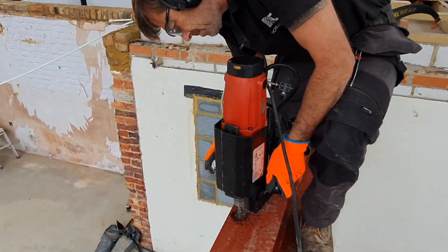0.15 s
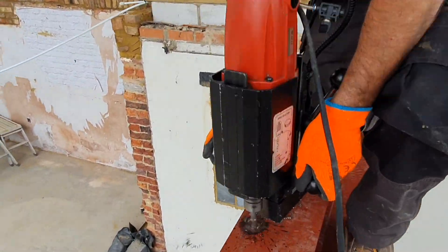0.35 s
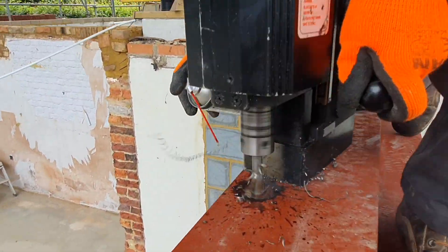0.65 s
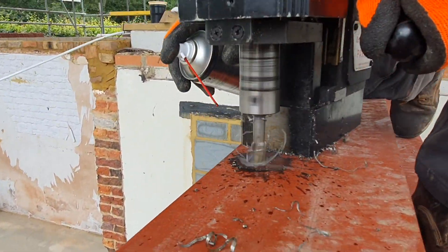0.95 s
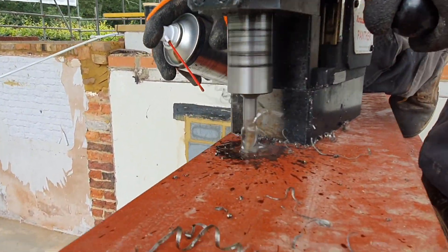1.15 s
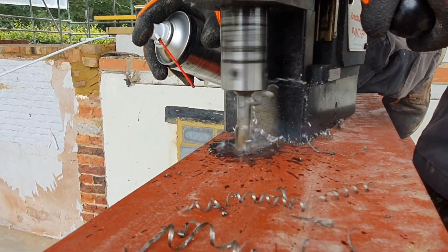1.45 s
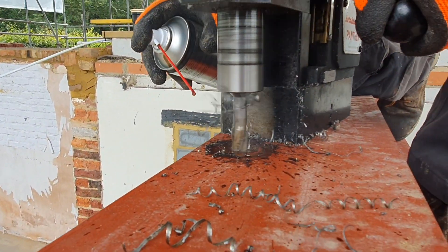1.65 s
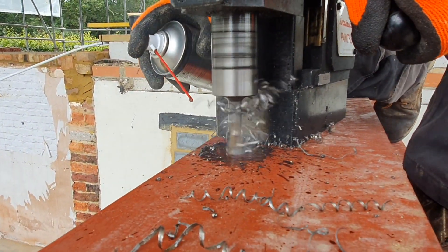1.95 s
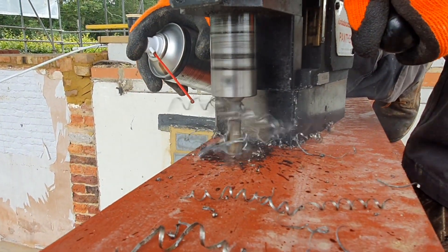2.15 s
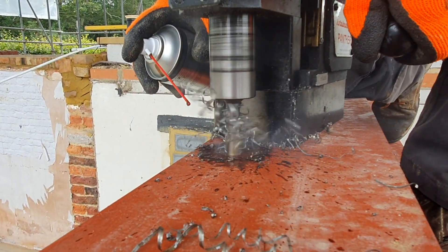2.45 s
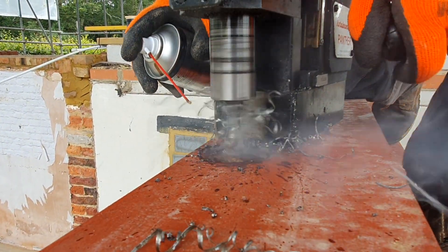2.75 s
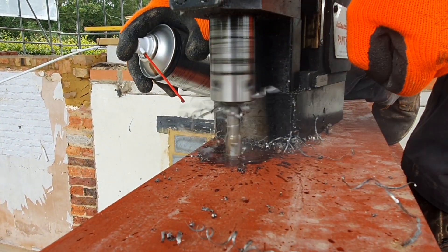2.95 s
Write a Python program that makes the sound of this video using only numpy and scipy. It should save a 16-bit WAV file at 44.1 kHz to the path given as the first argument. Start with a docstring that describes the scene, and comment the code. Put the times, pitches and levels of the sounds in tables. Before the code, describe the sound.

A magnetic drill bores through a steel beam close to the microphone, its high gear whine wavering over a bright cutting hiss and rushing fan air. Near the end, metal chips scrape as the cutter eases.

```python
"""Magnetic drill in a steel beam

Close to the microphone, in mono. The gears whine, sagging in pitch and singing out as the cutter
is pressed harder. The cutter hisses in the steel, throbbing with a gear shaft, and chips scrape
as it eases. With them come the rotor's comb of thin lines and the cooling fan's broad rush."""
import sys
import numpy as np
from scipy.fft import rfft, irfft, next_fast_len
from scipy.io import wavfile
from scipy.ndimage import map_coordinates

SR = 44100
rng = np.random.default_rng(int(sys.argv[2]) if len(sys.argv) > 2 else 0)


def log_audio(samples):
    """Write samples as a 16-bit WAV file to the path given in sys.argv[1]."""
    # one column per channel
    frames = np.atleast_2d(samples).T
    # limit to full scale, then quantise
    limited = np.clip(frames, -1, 1)
    pcm = np.round(limited * 32767).astype(np.int16)
    wavfile.write(sys.argv[1], SR, pcm)


N = 136710

# tooth rate of the first gear pair: t/s, f/Hz
TOOTH_RATE = [(0, 1241.3), (0.3, 1225), (0.42, 1227), (0.57, 1202), (0.63, 1204), (0.75, 1219), (0.9, 1234),
              (1.2, 1245), (1.5, 1242), (1.7, 1253), (1.8, 1245), (1.91, 1232), (2.1, 1235), (2.25, 1228),
              (2.48, 1245), (2.63, 1223), (2.73, 1214.7), (2.83, 1257), (2.94, 1242), (3.005, 1220),
              (3.09, 1281)]
# steady gear partials: multiple of the tooth rate, level/dB, flutter/dB, jitter/rad
STEADY_PARTIALS = [(1, -36, 1, 0.15), (3, -41, 3, 0.58), (4, -41, -0.5, 0.36)]
# gear partials that sing under load: t/s, level/dB of the 2nd, 5th and 10th
SINGING_LEVELS = [(0, -36, -28.5, -39), (.35, -34.5, -31.5, -33), (.53, -35.5, -28, -25),
                  (.63, -37, -32.5, -30), (.7, -36, -35, -38), (.95, -35.5, -31.5, -35),
                  (1.25, -35, -32.5, -33), (1.76, -35, -34.5, -33), (1.88, -35, -28, -26),
                  (1.96, -36, -34.5, -32), (2.17, -33.5, -30, -25), (2.33, -36, -33.5, -35),
                  (2.5, -33, -32, -33), (2.55, -33, -29.5, -25), (2.71, -34.5, -29, -24),
                  (2.8, -39.5, -49, -42), (2.88, -34.5, -35, -27), (2.985, -30, -28.5, -32),
                  (3.015, -42, -39, -46), (3.1, -43, -37, -46)]
# partials that grow as the motor bogs down: multiple of the tooth rate, base level/dB
STRAIN_PARTIALS = [(7, -53), (8, -47), (9, -43.5)]
# the cut: t/s, hiss level/dB, share of the deep sound (0-1)
CUT_COURSE = [(0, -23.5, 0.15), (.9, -23.5, 0.33), (1.55, -23, 0.13), (1.75, -23, 0.3), (1.87, -22, 0.9),
              (2.35, -22, 0.78), (2.56, -21.5, 1), (2.8, -23.5, 1), (2.9, -23.5, 0.97), (3.03, -27.5, 1),
              (3.1, -26, 1)]
# hiss of the shallow and of the deep cut: f/Hz, relative level/dB
SHALLOW_SPECTRUM = [(3000, -60), (6800, -20), (8050, -11), (8600, 4), (8950, -5.5), (9300, 1.5), (9850, 1),
                    (10300, -1), (11150, 2), (11600, -1.5), (12200, 0), (12700, -5), (14000, -4.5),
                    (15600, -7.5)]
DEEP_SPECTRUM = [(3000, -71), (6800, -36), (8050, -3), (8600, 0), (8950, -3), (9300, -0.5), (9850, -1.5),
                 (10250, -9), (10700, -14), (11150, 2), (12200, 0.5), (12700, 1), (14000, -1),
                 (15600, -8.5)]
# scraping chips: f/Hz, relative level/dB
CHIP_SPECTRUM = [(100, -90), (1000, -39), (2800, -4), (4000, -1.5), (4850, 4), (5400, -7), (9000, -30)]
# course of the scraping: t/s, level/dB
CHIP_LEVEL = [(0, -48), (2.7, -50), (2.85, -32), (3.0, -39), (3.07, -29), (3.1, -30)]
# fan air and housing: f/Hz, relative level/dB
FAN_SPECTRUM = [(30, -59), (100, -63), (150, -44), (200, -32.5), (320, -21.5), (600, -17), (1000, -10.5),
                (1400, -5), (1950, -8.5), (2600, -1), (3200, -4), (4000, -3.5), (4800, -0.6), (5350, -8.5),
                (5800, -5), (6800, -1.15), (7600, -2.4), (9000, -3.5), (16000, -16)]
# rotor lines: multiple of the rotor speed, relative level/dB
ROTOR_LINES = [(9, -54), (30, -47), (31, -52), (32, -50), (40, -38.5), (42, -43), (43, -40), (44, -40),
               (46, -46), (49, -41.5), (50, -41), (53, -42.5), (55, -45), (56, -44), (57, -45), (61, -45),
               (71, -46)]
# mains hum: f/Hz, level/dB
HUM_LINES = [(120, -94.5), (240, -68.5)]

TEETH, ROTOR_TURNS = 31, 5  # per turn of the lay shaft
SHAFT_TURNS_PER_TOOTH = .03  # the shaft that throbs
FLUTTER_HZ, TOP_HZ = 128.4, 15800


def gear_whine(mesh, shaft):
    """Meshing teeth: some partials hold steady, others sing with the load and swing with the shaft."""
    whine = sum(amp(db) * partial(k * mesh, flutter, jitter)
                for k, db, flutter, jitter in STEADY_PARTIALS)
    swayed = mesh + .08 * np.sin(shaft)
    throb_db = 1.2 * np.cos(shaft)
    for k, db in zip((2, 5, 10), curves(SINGING_LEVELS)):
        gain = amp(db + .14 * wobble(21.9))
        whine += gain * partial(k * swayed, flutter_db=1.7, jitter_rad=.3, swell_db=throb_db)
    return whine


def gear_strain(mesh, mesh_hz, deep):
    """A metallic edge on the whine when the motor slows, weaker in the deep cut."""
    free_hz, db_per_hz = 1245, .1613
    gain = amp(db_per_hz * (free_hz - mesh_hz) - 7 * deep)
    return gain * sum(amp(db) * partial(k * mesh, flutter_db=2, jitter_rad=.25)
                      for k, db in STRAIN_PARTIALS)


def cutter_hiss(rotor, shaft, level_db, deep):
    """The cutter hisses in the steel, pulsing once a shaft turn and twice a rotor turn."""
    hiss = np.sqrt(1 - deep) * noise(SHALLOW_SPECTRUM) + np.sqrt(deep) * noise(DEEP_SPECTRUM)
    pulse_db = .55 * np.cos(shaft) + .35 * np.cos(2 * rotor)
    grain_db = .3 * wobble(970)
    return amp(level_db + pulse_db + grain_db) * hiss


def chip_scrape():
    """Chips scrape, lower than the hiss, coming up as the cutter eases."""
    level_db, = curves(CHIP_LEVEL)
    return amp(level_db + 1.5 * wobble(120)) * noise(CHIP_SPECTRUM)


def motor(rotor, deep):
    """Fan air, rotor lines that weaken once the cutter is deep, and a faint mains hum."""
    air = amp(-26) * noise(FAN_SPECTRUM)
    lines = sum(amp(db) * partial(k * rotor, flutter_db=1.5, jitter_rad=.15) for k, db in ROTOR_LINES)
    t = np.arange(N) / SR
    hum = sum(amp(db) * partial(2 * np.pi * hz * t, flutter_db=.4, jitter_rad=.05)
              for hz, db in HUM_LINES)
    return air + amp(1.5 - 4 * deep) * lines + hum


def amp(db):
    """Decibels to gain."""
    return 10 ** (np.asarray(db) / 20)


def unit(x):
    """Scale to rms 1."""
    return x / np.sqrt(np.mean(x ** 2) + 1e-20)


def curves(rows):
    """One value per sample for each column after the time."""
    times, *columns = np.transpose(rows)
    return [np.interp(np.arange(N) / SR, times, column) for column in columns]


def wobble(rate):
    """A smooth random curve, rate knots a second."""
    return map_coordinates(rng.standard_normal(N // 8), [np.arange(N) * rate / SR], mode="mirror")


def filtered(x, response):
    """Filter x by a gain given as a function of frequency."""
    size = next_fast_len(N + SR // 2)
    return irfft(rfft(x, size) * response(np.fft.rfftfreq(size, 1 / SR)), size)[:N]


def noise(spectrum):
    """Noise of rms 1, coloured by points of f/Hz, level/dB."""
    f, db = np.transpose(spectrum)
    white = rng.standard_normal(N)
    return unit(filtered(white, lambda hz: amp(np.interp(np.log(hz + 1), np.log(f), db))))


def partial(angle, flutter_db, jitter_rad, swell_db=0):
    """A tone of rms 1 whose level and phase flutter."""
    start = rng.uniform(0, 2 * np.pi)
    gain = amp(swell_db + flutter_db * wobble(FLUTTER_HZ))
    return unit(gain * np.sin(angle + start + jitter_rad * wobble(FLUTTER_HZ)))


def scene():
    """The drill from close by, alike in both channels; one speed turns gears, rotor and shaft."""
    mesh_hz, = curves(TOOTH_RATE)
    mesh = 2 * np.pi * np.cumsum(mesh_hz + .754 * wobble(25.1)) / SR  # phase/rad, one cycle a tooth
    rotor = mesh * ROTOR_TURNS / TEETH
    shaft = mesh * SHAFT_TURNS_PER_TOOTH
    hiss_db, deep = curves(CUT_COURSE)
    deep = np.clip(deep, 0, 1)
    gears = gear_whine(mesh, shaft) + gear_strain(mesh, mesh_hz, deep)
    cutting = cutter_hiss(rotor, shaft, hiss_db, deep) + chip_scrape()
    drill = gears + cutting + motor(rotor, deep)
    return np.array([drill, drill])


def record(dry):
    """The camera's microphone channel passes nothing above its band limit."""
    return np.array([filtered(channel, lambda hz: hz < TOP_HZ) for channel in dry])


dry = scene()
out = record(dry)
log_audio(out)
```